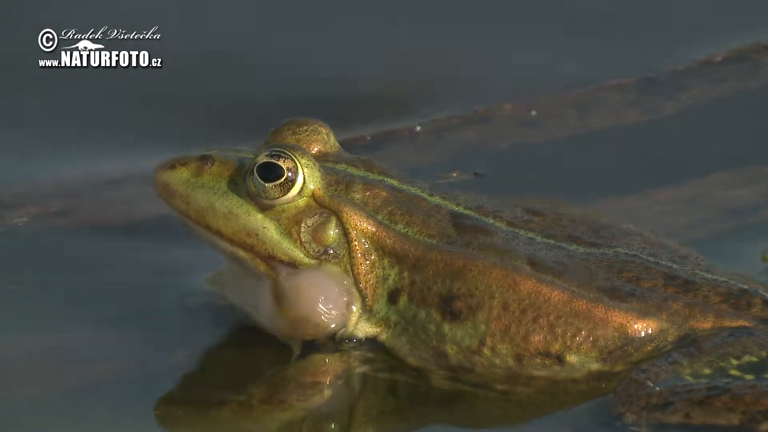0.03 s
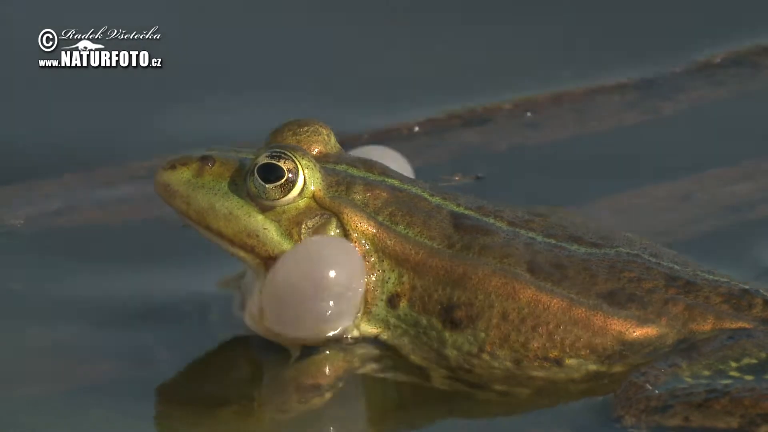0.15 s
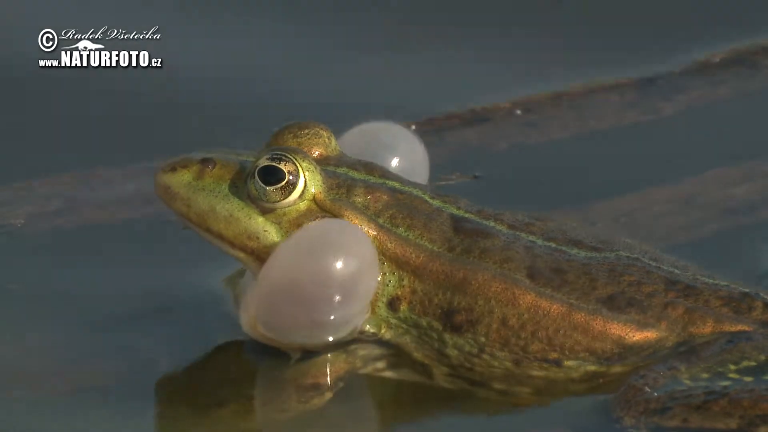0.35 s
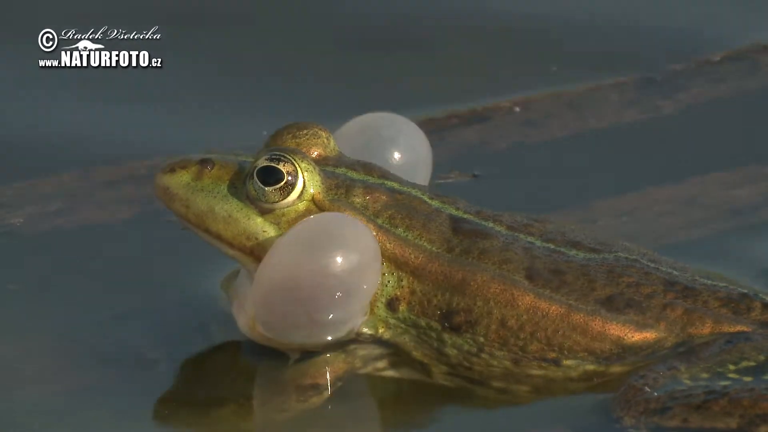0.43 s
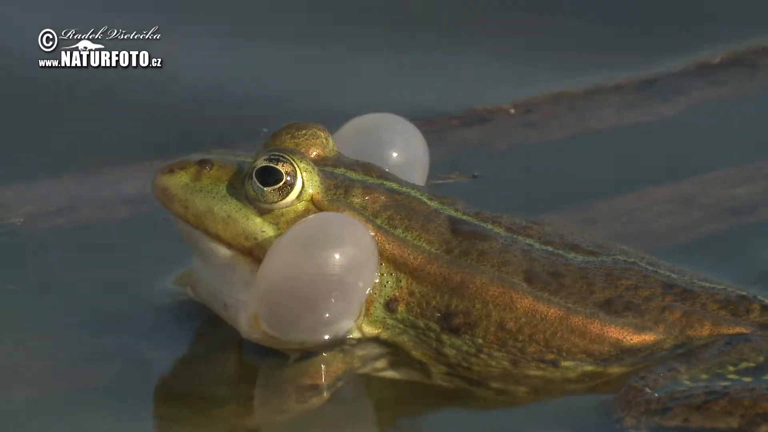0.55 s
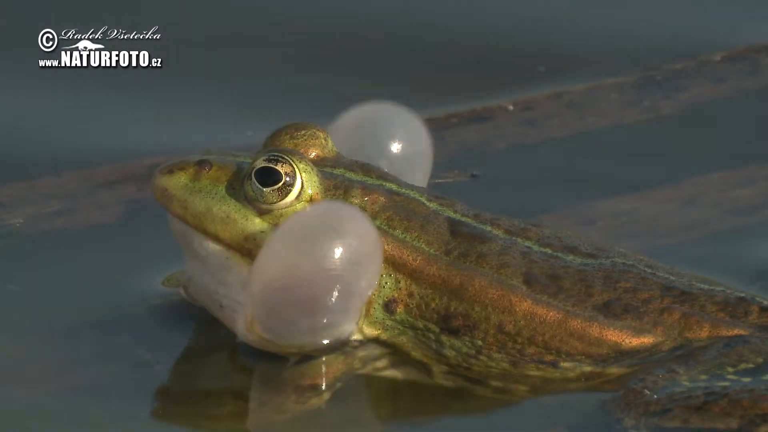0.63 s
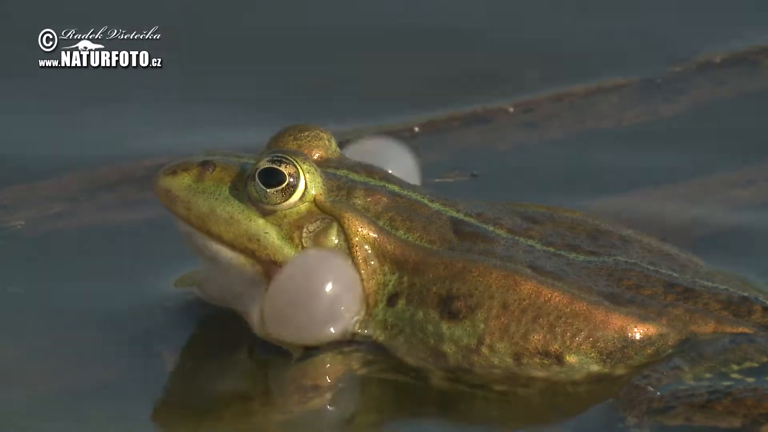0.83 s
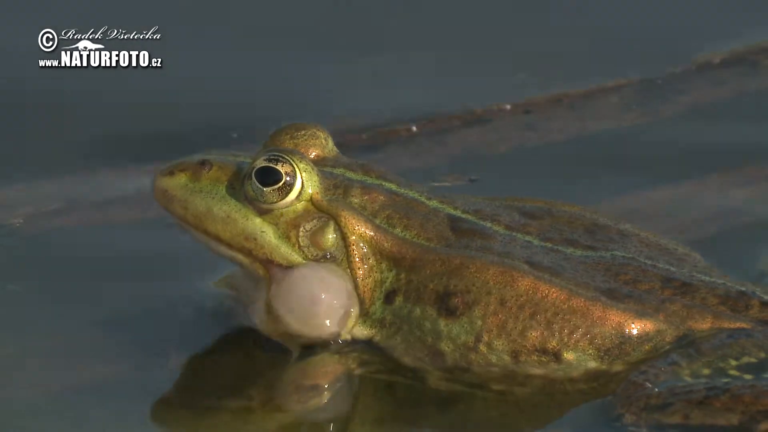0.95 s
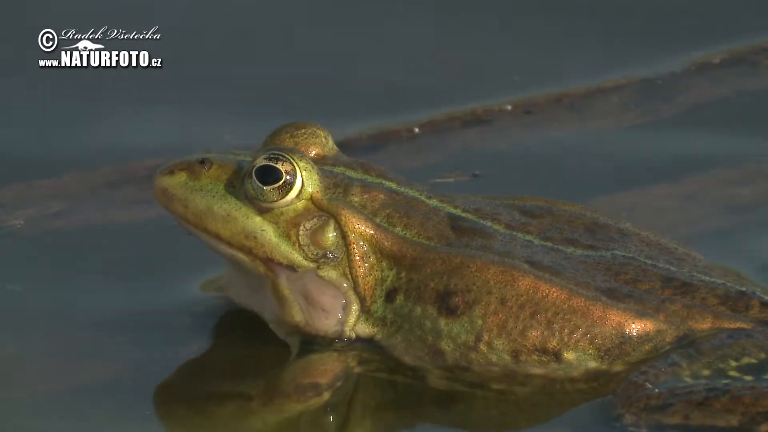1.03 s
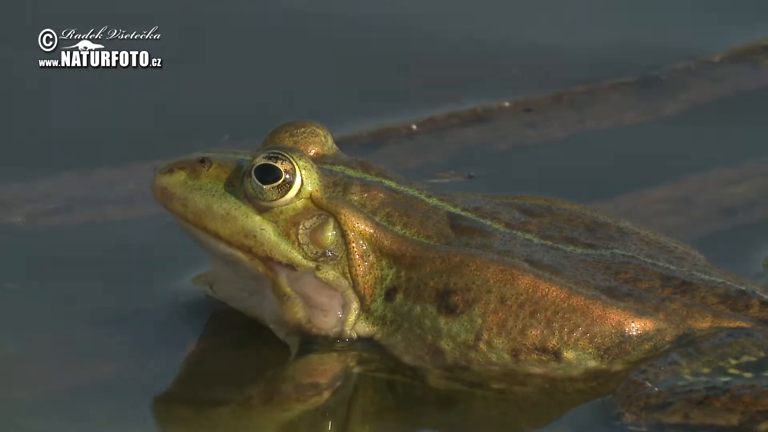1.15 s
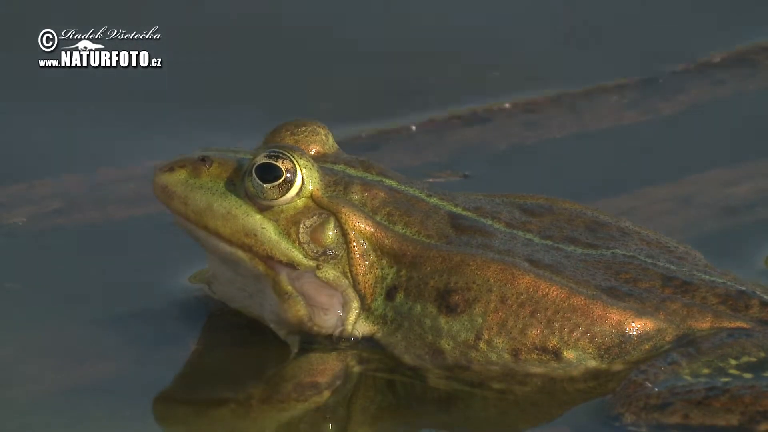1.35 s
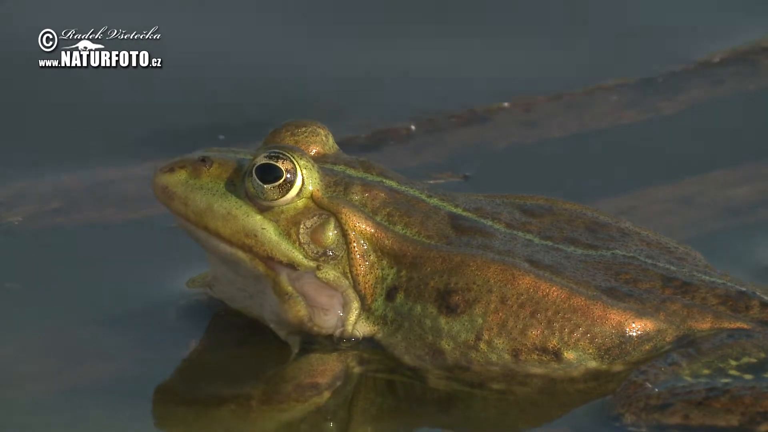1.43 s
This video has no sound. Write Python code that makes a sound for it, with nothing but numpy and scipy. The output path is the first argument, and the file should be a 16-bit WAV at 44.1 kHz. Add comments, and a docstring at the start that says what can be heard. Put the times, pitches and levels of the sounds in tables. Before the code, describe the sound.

Water frogs rattle in rapid, throbbing croaks one after another above a distant frog chorus.

```python
"""Still pond: three water frogs rattle one after another, while far frogs click and hoot and small birds chirp.
Each throb of a call is a crescendo of larynx clicks; every click is an impulse exciting the decaying modes
of inflated vocal sacs, head and throat. Hoots and chirps are arched harmonic series; the farthest frogs and
a scratchy bird are band-shaped noise. Coloured noise and mains hum lie beneath; the pond scatters the clicks."""
import sys
import numpy as np
from scipy import signal
from scipy.fft import rfft, irfft
from scipy.io import wavfile

SR = 44100
rng = np.random.default_rng(int(sys.argv[2]) if len(sys.argv) > 2 else 0)


def decibels_to_gain(level_db):
    """Convert a level in decibels to a linear amplitude gain (20 dB per decade)."""
    exponent = np.asarray(level_db, float) / 20
    return 10 ** exponent


def int16_out(signal):
    """Quantize to a 16-bit WAV file."""
    q = np.round(np.clip(np.atleast_2d(signal).T, -1, 1) * 32767)
    wavfile.write(sys.argv[1], SR, q.astype(np.int16))


N = 66150

# Air spectrum, relative: f/Hz, level/dB per Hz. Its side part: f/Hz, level/dB relative to mid
AIR_SPECTRUM = [(18, -6), (30, -2), (70, -4), (120, -15), (220, -21.5), (320, -19), (600, -26), (1500, -33),
                (3000, -39.5), (4500, -47.5), (8000, -49.5), (15500, -49)]
AIR_SIDE_SPECTRUM = [(30, -21.5), (100, -18.5), (500, -14.5), (1500, -12.5), (3500, 29.5), (5000, 17.5),
                     (8000, 1.5), (15000, 10.5)]
# Soft tonal calls: start t/s, length t/s, pitch f/Hz, arch share of pitch,
# levels/dB of harmonics 1-4, left-right level/dB
HOOTS = [(-.03, 0.083, 564.6, 0.018, (-63, -100, -64.5, -83), 2),
         (-.03, 0.078, 839, 0.0091, (-100.5, -98.5, -59, -79), 3),
         (1.09, 0.078, 550, 0.019, (-50, -82, -100.5, -83.5), 2),
         (1.14, 0.12, 517, 0.054, (-49, -85, -67, -101), -1),
         (1.225, 0.1, 529.5, 0.035, (-59.5, -80.5, -80, -86.5), -1)]
CHIRPS = [(.103, 0.038, 1340, 0.12, (-94, -71, -70, -86), 7.3),
          (.145, 0.043, 1287, 0.077, (-95, -68.5, -105, -102), 26.5)]
# Throbs of each near frog: main click ending the crescendo t/s, its relative level/dB, gap before it t/ms,
# clicks near full strength, delay of late click t/ms, its level/dB re the main click, sac f/Hz
FIRST_THROBS = [(.1735, -38, 4.4, 4, 5.8, 0, 1330), (.2061, -31, 5.6, 1.9, 7.3, 0, 1640),
                (.2478, -29, 5.5, 2.1, 6.8, 3, 1780), (.2950, -23, 6, 1.9, 9.3, -2, 1870),
                (.3394, -24, 5.3, 1.9, 6.9, 2, 1920), (.3919, -22, 6.3, 1.8, 10.8, 1, 1950),
                (.4424, -20, 6.4, 2.2, 12.2, -1, 2000), (.4952, -19, 6.5, 1.6, 10.5, -1, 2010),
                (.5472, -20, 6.3, 1.3, 8, 1, 2010), (.6099, -18, 6.1, 4, 15.6, -8, 1810),
                (.6641, -18, 5.6, 4.8, 12.7, -3, 1770), (.7197, -18, 5, 4.4, 5.2, -1, 1840)]
SECOND_THROBS = [(.6804, -21, 8.5, 1.8, 15.6, -10, 1790), (.7719, -20, 6.4, 1.6, 14.9, 0, 2040),
                 (.8234, -19, 5.1, 1.2, 13.9, 0, 2100), (.8805, -19, 6.8, 1.5, 12.4, 1, 2130),
                 (.9418, -18, 6.9, 1.7, 11, -18, 2130), (1.0009, -18, 6.7, 1.7, 11.6, -16, 2120),
                 (1.0609, -18, 6.4, 1.9, 13.2, -2, 1840), (1.1221, -20, 5.5, 2.2, 8.6, 0, 1710),
                 (1.1901, -19, 5.7, 6.5, 7.7, -6, 1760)]
THIRD_THROBS = [(1.2292, -32, 9.3, 2, 21, -8, 2190), (1.2825, -29, 7.3, 3.3, 23, -8, 2180),
                (1.3381, -29, 6.7, 2.6, 21, -11, 2190), (1.3914, -29, 5.6, 2.5, 7.7, 0, 2060),
                (1.4511, -29, 6.2, 3.8, 15.2, -9, 1880), (1.4949, -34, 4.2, 1.5, 6, 3, 1830)]
# Single trailing clicks: t/s, relative level/dB, sac f/Hz, extra throat level/dB
FIRST_STRAYS = [(0.1865, -38.5, 1520, -3), (0.224, -37, 1616, -6), (0.2653, -34.5, 1920, -5.5),
                (0.3623, -31, 1890, -11), (0.5702, -31.5, 1950, -5), (0.5747, -26, 1940, 5),
                (0.6355, -35, 1776, 0.5), (0.7086, -22.5, 1833, 1), (0.7330, -26, 2020, 12.5),
                (0.7447, -30.5, 1670, 18.5)]
SECOND_STRAYS = [(.8480, -31.5, 1783, 11), (0.909, -32.5, 1740, -1), (0.9602, -30, 1850, 8.5),
                 (1.0197, -33.5, 1690, 4), (1.2113, -29.5, 1920, 19.5), (1.1745, -24.5, 1740, 15.5),
                 (1.219, -40.5, 2150, 18.5)]
# Place and build of each frog: lag of left t/us, left-right level/dB, head and throat level/dB,
# treble level/dB, sideways snap level/dB, ring length factor, sac rise t/ms
FIRST_PLACE = (42.5, -0.6, -1.5, 6, -43, 1.16, 0.28)
SECOND_PLACE = (61.5, -1.6, -2, -12.5, -29, 1.94, .5)
THIRD_PLACE = (-32, -2.1, -5.5, -7, -46.5, 1, .25)
# Modes of head and water surface, of the low throat, and of the treble:
# nominal f/Hz, relative level/dB, 60 dB decay t/s
BODY_MODES = [(890, -36, 0.006), (1020, -23.5, 0.012), (1297, -12, 0.013), (2370, -34.5, 0.0081)]
THROAT_MODES = [(410.7, -32.5, 0.06), (454.6, -30.5, 0.066), (675, -29.5, 0.0089)]
TREBLE_MODES = [(8100, -51.5, 0.00049), (11020, -50.5, 0.0037), (12750, -49.5, 0.006),
                (15000, -65.5, 0.0052)]
# High whistle mode over time: t/s, nominal f/Hz, relative level/dB
WHISTLE_TRACK = [(.16, 5450, -72.5), (.22, 5460, -33), (0.501, 5233, -32), (1.2, 5130, -29),
                 (1.5, 5160, -60)]
# Far frogs: t/s, base click level/dB
CHORUS_SWELL = [(0.169, -62.5), (.3, -45.5), (0.501, -43), (0.702, -43), (0.851, -44.5), (1.031, -46),
                (1.1, -42), (1.25, -49), (1.5, -44.5)]
# Noise bands of frogs too far to tell apart, and of the scratchy bird: f/Hz, width f/Hz, relative level/dB
BLUR_BANDS = [(2000, 570, -1), (3340, 2600, -24.5), (5204, 100, -17)]
RASP_BANDS = [(6440, 850, 1.5), (14400, 6800, -11)]
# Puffs of the far scratchy bird: middle t/s, level/dB
RASP_PUFFS = [(0.935, -75), (1.045, -74.5), (1.156, -76.5), (1.264, -75.5)]

SAC_T60, CHOKE_T60 = 0.02, 0.0039  # s; sac decay before frog and pitch scale it, decay once choked
PAIR_RATIO, PAIR_DB = 0.896, -14.5  # pitch and level of the second sac re the first
SLACK, TAUT, TAUT_HZ = 1.8, 1.2, 1860  # exponents shortening the ring of slack and taut sacs; pitch of tautness
FULL_DB, WEAK_SHARE = -30, 0.089  # below this click level, other modes escape this share of the drop
QUICKEN, SHORTEST_MS = 0.86, 4.1  # each earlier gap shrinks by this factor, down to this floor
CRESCENDO_STEEP = 1.6  # exponent of the crescendo curve


def read(points, hz):
    """Linear interpolation of level over a logarithmic frequency axis."""
    f, value = np.transpose(points)
    return np.interp(np.log(hz + 1), np.log(f + 1), value)


def evened(x):
    """Normalization to unit rms."""
    return x / np.sqrt(np.mean(x ** 2))


def add(mix, s, sound):
    """Superposition of a two-channel sound from s seconds on, cut at the edges of the mix."""
    at = round(s * SR)
    sound = sound[:, max(-at, 0):]
    part = mix[:, max(at, 0):][:, :sound.shape[1]]
    part += sound[:, :part.shape[1]]


def sides(db):
    """Level difference between ears, as left and right gains."""
    return decibels_to_gain(np.array([[db], [-db]]) / 2)


def noise(gain):
    """Spectral shaping: two independent white noises coloured by gain(Hz)."""
    return irfft(rfft(rng.standard_normal((2, N))) * gain(np.fft.rfftfreq(N, 1 / SR)), N)


def humps(bands, f):
    """Sum of Gaussian passbands."""
    return sum(decibels_to_gain(db) * np.exp(-((f - hz) / width) ** 2) for hz, width, db in bands)


def air():
    """Stationary random noise in mid and side, with a sinusoidal mains hum."""
    mid, side = noise(lambda f: decibels_to_gain(read(AIR_SPECTRUM, f) + np.array([0 * f, read(AIR_SIDE_SPECTRUM, f)])))
    hum = decibels_to_gain(-65) * np.sin(2 * np.pi * 50 * np.arange(N) / SR)
    return decibels_to_gain(-61.5) * np.array([mid + side, mid - side]) / mid.std() + hum


def tonal_calls(rows, right_sign):
    """Harmonic series on an arched pitch; opposite phase at the right (-1) places it far to the side."""
    out = np.zeros((2, N))
    for s, length, hz, arch, dbs, pan_db in rows:
        u = np.arange(0, length, 1 / SR) / length
        pitch = hz * (1 - arch * (2 * u - 0.8) ** 2)
        phase = 2 * np.pi * np.cumsum(pitch) / SR
        tone = sum(decibels_to_gain(db) * np.sin((k + 1) * phase) for k, db in enumerate(dbs))
        tone = tone * np.sin(np.pi * u) ** 1.9
        add(out, s, tone * sides(pan_db) * [[1], [right_sign]])
    return out


def ring(t, hz, db, t60, turns=0):
    """Free vibration of one mode with exponential decay."""
    return -decibels_to_gain(db - 60 * t / t60) * np.sin(2 * np.pi * (hz * t + turns))


def sac_ring(t, hz, ringing, rise_ms, free_s):
    """Damped resonance of two sacs apart in pitch, choked when the next click comes after free_s."""
    t60 = SAC_T60 * ringing * min(hz / 1800, 1) ** SLACK
    pair = ring(t, hz, 0, t60) + ring(t, hz * PAIR_RATIO, PAIR_DB, t60)
    rise = (1 - np.exp(-1000 * t / rise_ms)) ** 2
    # the level also curls down with time squared, sooner in a taut sac
    curl = t / 0.016 * max(hz / TAUT_HZ, 1) ** TAUT
    choke = np.maximum(t - free_s, 0) / CHOKE_T60
    return pair * rise * decibels_to_gain(-60 * choke - 60 * curl ** 2)


def head_and_throat(t, sac_hz, body_db, throat_db):
    """Modal superposition; throat modes start high and droop, and a slacker sac leaves more throat."""
    throat_db = throat_db + 10 * (TAUT_HZ - sac_hz) / 1000
    droop = 0.35 * (1 - np.exp(-t / 0.0007))
    wobble = rng.standard_normal(7)
    body = sum(ring(t, f * (1 + 0.085 * w), db + body_db, t60)
               for (f, db, t60), w in zip(BODY_MODES, wobble))
    throat = sum(ring(t, f * (1 + w / 30), db + body_db + throat_db, t60, droop)
                 for (f, db, t60), w in zip(THROAT_MODES, wobble[4:]))
    return body + throat


def radiated(x):
    """Band limits of radiation from sacs and throat."""
    highpass = signal.butter(6, 385, "high", fs=SR, output="sos")
    lowpass = signal.butter(4, 2950, fs=SR, output="sos")
    return signal.sosfilt(np.vstack([highpass, lowpass]), x)


def whistle(t, s, lift_db):
    """Beating of two close high modes whose pitch and level depend on the time s of the click."""
    at, hz, db = np.transpose(WHISTLE_TRACK)
    hz = np.interp(s, at, hz) * (1 + 0.019 * rng.standard_normal())
    db = np.interp(s, at, db) + lift_db
    return ring(t, hz, db, 0.015) + ring(t, hz * 1.005, db - 6, 0.0075)


def treble(t, db):
    """Modal superposition at the highest frequencies."""
    wobble = rng.standard_normal(len(TREBLE_MODES))
    return sum(ring(t, f * (1 + w / 70), d + db, t60) for (f, d, t60), w in zip(TREBLE_MODES, wobble))


def snap(t, db):
    """Lateral localization: a short mode almost wholly in the left channel."""
    hz = 4480 * (1 + 0.062 * rng.standard_normal())
    return ring(t, hz, db, 0.011) * [[1], [-0.019]]


def click(s, db, hz, place, throat_db=0, free_s=1):
    """Impulse excitation by the larynx of sacs, head, throat and high modes, with a lag between ears."""
    lag_us, pan_db, body_db, treble_db, snap_db, ringing, rise_ms = place
    now = np.arange(1200) / SR
    t = np.maximum(now - 1e-4 - np.array([[0.5], [-0.5]]) * lag_us * 1e-6, 0)
    lift_db = WEAK_SHARE * (FULL_DB - db)  # weak clicks keep more throat and whistle
    sac = sac_ring(t, hz, ringing, rise_ms, free_s)
    low = radiated(sac + head_and_throat(t, hz, lift_db + body_db, throat_db))
    high = whistle(t, s, lift_db) + snap(t, snap_db)
    onset = 1 - np.exp(-t / 0.0006)
    return decibels_to_gain(db + 3) * sides(pan_db) * (low + treble(now, treble_db) + high * onset)


def frog(throbs, strays, place, depth_db, glide=0):
    """Pulse-train crescendo: weak quick clicks slow as they grow, then a late click.

    With a glide (Hz per s as the sac first fills), the sac pitch also slides between throbs.
    """
    out, k, table = np.zeros((2, N)), np.arange(8), np.array(throbs)
    first = table[0, 0]
    last = first - 0.014
    for s, db, gap, wide, late, late_db, hz in throbs:
        gaps = np.maximum(gap * QUICKEN ** k, min(gap, SHORTEST_MS))
        times = s - np.cumsum(gaps) / 1000
        drop = depth_db * (1 - np.exp(-((k + 1) / max(wide, 0.3)) ** CRESCENDO_STEEP))
        rows = sorted([(s, db), (s + late / 1000, db + late_db)] + list(zip(times, db + drop)))
        for (at, level), (then, _) in zip(rows, rows[1:] + [(2, 0)]):
            slid = np.interp(at, table[:, 0], table[:, 6]) - glide * max(first - at, 0)
            # clicks that would fall into the throb before are left out
            if at > last:
                add(out, at, click(at, level, slid if glide else hz, place, free_s=then - at))
        last = s + late / 1000 + SHORTEST_MS / 1000
    for s, db, hz, throat_db in strays:
        add(out, s, click(s, db, hz, place, throat_db))
    return out


def chorus():
    """Random point process: clicks of far frogs at random moments, pitches, levels and directions."""
    out, (s, db) = np.zeros((2, N)), np.transpose(CHORUS_SWELL)
    draw = rng.random((400, 5))
    times = s[0] + np.cumsum((0.3 + 1.2 * draw[:, 0]) / 170)
    for at, row in zip(times, draw):
        hz = 1780 + row[1] * (2240 - 1780)
        level = np.interp(at, s, db) - 3 * np.log(row[2] + 0.092)
        place = (160 * (row[3] - 0.3), 8 * (row[4] - 0.6), -9, -12, -26, 0.7, 0.3)
        if at < N / SR:
            add(out, at, click(at, level, hz, place))
    return out


def blur():
    """Incoherent summation: the farthest frogs merge into a rough wash that swells with the chorus."""
    t, (s, db) = np.arange(N) / SR, np.transpose(CHORUS_SWELL)
    mid, side = evened(noise(lambda f: humps(BLUR_BANDS, f)))
    swell = decibels_to_gain(np.interp(t, s, db) - 12) * (t > s[0])
    return swell * np.array([mid + 0.5 * side, mid - 0.5 * side])


def pond(x):
    """Diffuse scattering off water and reeds: convolution with a short decaying noise."""
    t = np.arange(6000) / SR
    tail = rng.standard_normal((2, len(t))) * decibels_to_gain(-60 * t / 0.065) * (t > 0.003)
    tail = tail / np.linalg.norm(tail[0])
    return x + decibels_to_gain(-16) * signal.fftconvolve(x, tail, axes=1)[:, :N]


def rasps():
    """Amplitude modulation: Gaussian puffs of high scratchy noise."""
    t = np.arange(N) / SR
    puffs = sum(decibels_to_gain(db) * np.exp(-((t - s) / 0.028) ** 2) for s, db in RASP_PUFFS)
    mid, side = evened(noise(lambda f: humps(RASP_BANDS, f)))
    return puffs * np.array([mid + 0.4 * side, mid - 0.4 * side])


def scene():
    """Superposition of frogs, birds and air, with only the clicks scattered by the pond."""
    near = frog(FIRST_THROBS, FIRST_STRAYS, FIRST_PLACE, depth_db=-18, glide=22000)
    near = near + frog(SECOND_THROBS, SECOND_STRAYS, SECOND_PLACE, depth_db=-22)
    near = near + frog(THIRD_THROBS, [], THIRD_PLACE, depth_db=-21)
    calls = tonal_calls(HOOTS, 1) + tonal_calls(CHIRPS, -1)
    return pond(near + chorus()) + calls + blur() + rasps() + air()


def band_limit(x):
    """A steep low-pass at the top of the band."""
    return signal.sosfilt(signal.butter(12, 15810, fs=SR, output="sos"), x)


def record(dry):
    """Linear pick-up: the finished mix is passed on at its own level."""
    return band_limit(dry)


dry = scene()
out = record(dry)
int16_out(out)
```